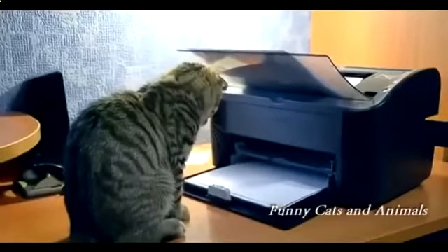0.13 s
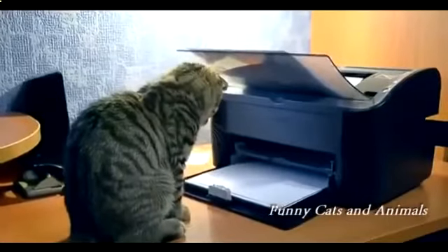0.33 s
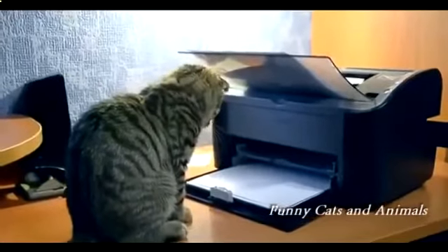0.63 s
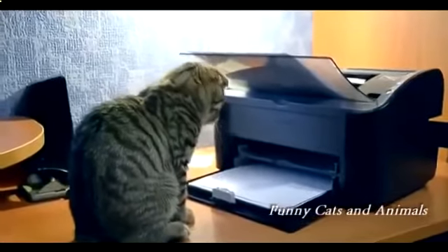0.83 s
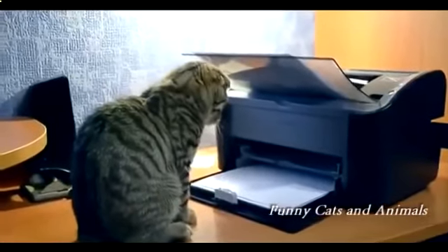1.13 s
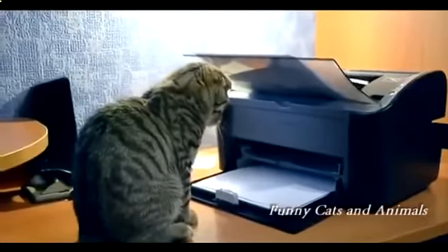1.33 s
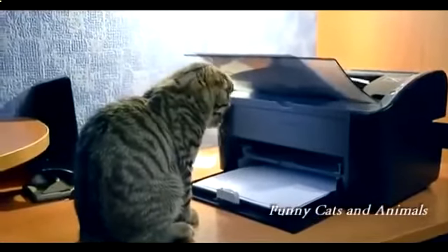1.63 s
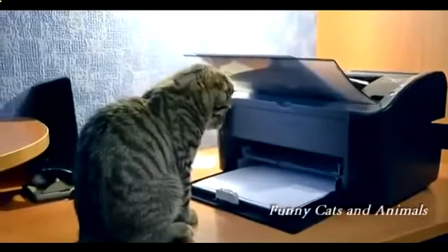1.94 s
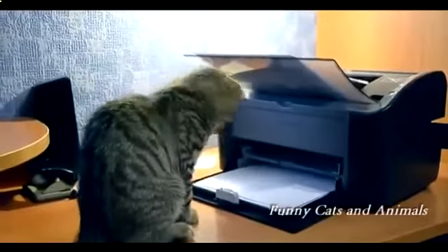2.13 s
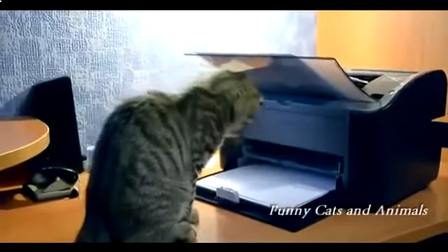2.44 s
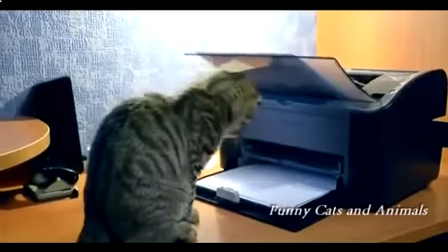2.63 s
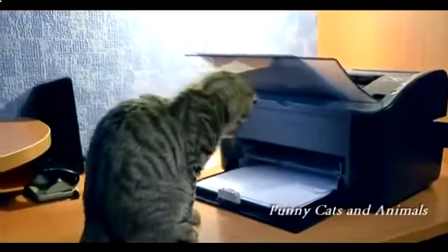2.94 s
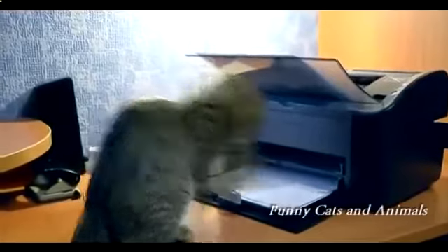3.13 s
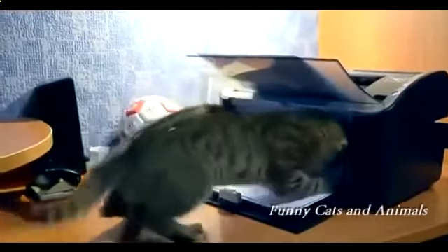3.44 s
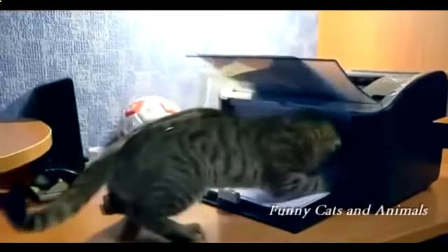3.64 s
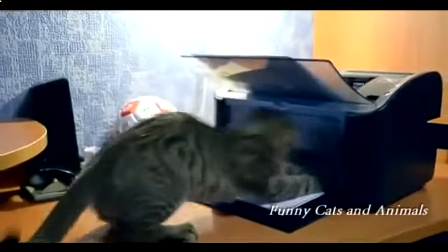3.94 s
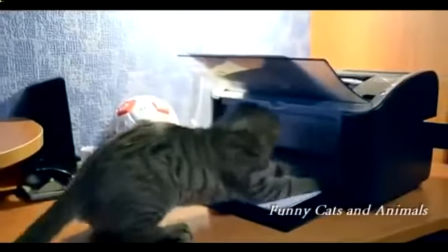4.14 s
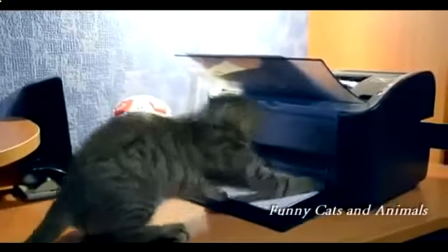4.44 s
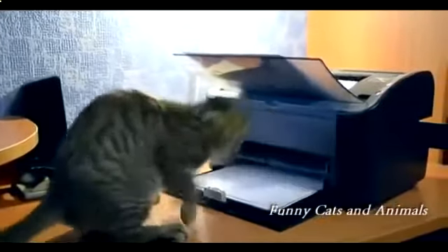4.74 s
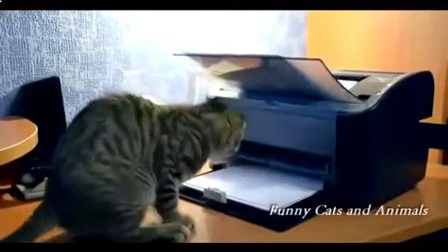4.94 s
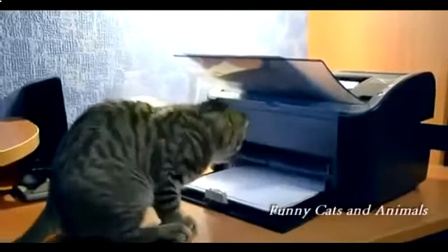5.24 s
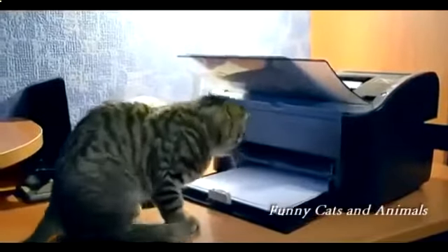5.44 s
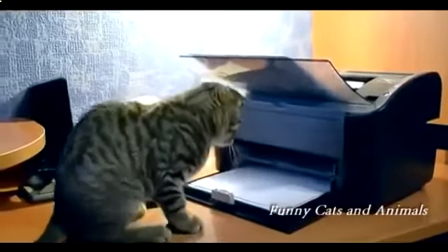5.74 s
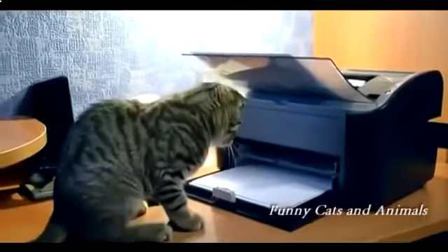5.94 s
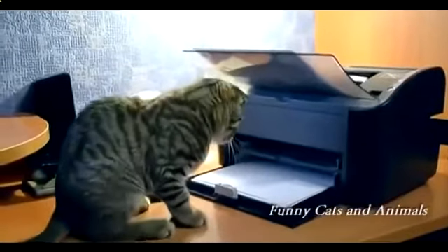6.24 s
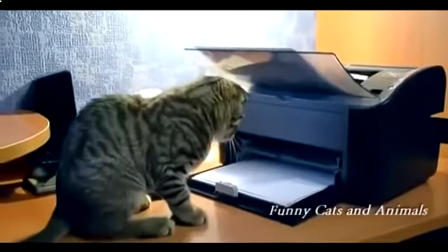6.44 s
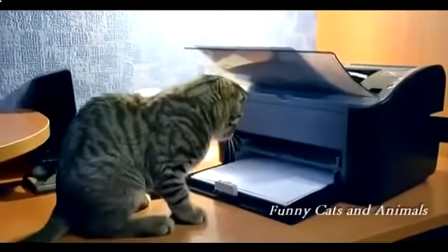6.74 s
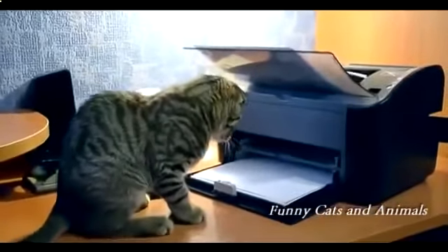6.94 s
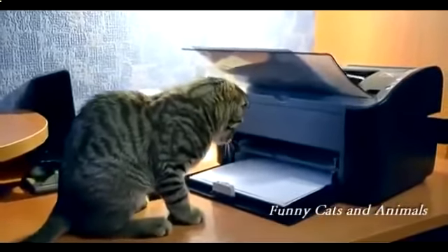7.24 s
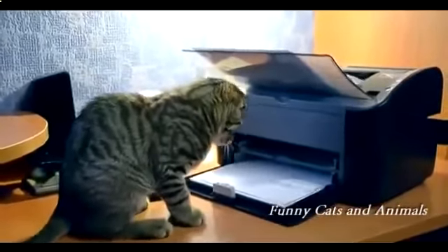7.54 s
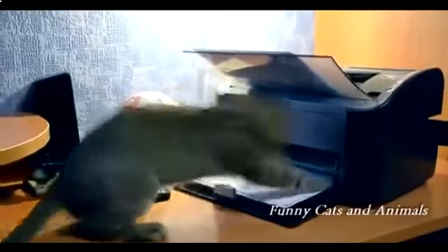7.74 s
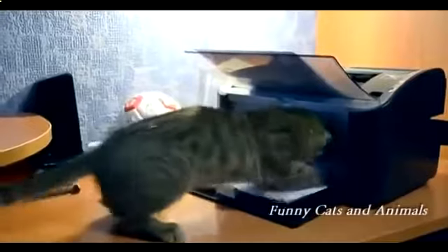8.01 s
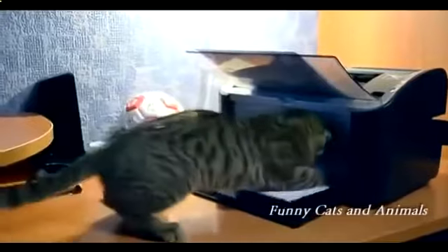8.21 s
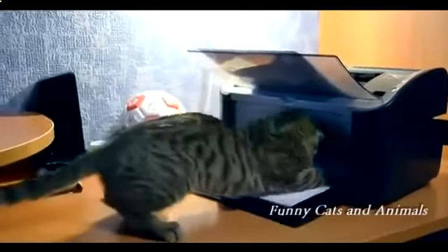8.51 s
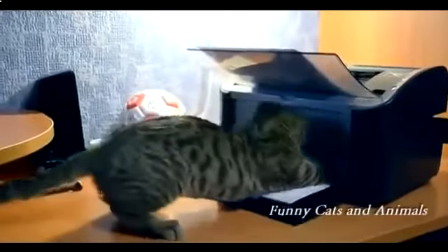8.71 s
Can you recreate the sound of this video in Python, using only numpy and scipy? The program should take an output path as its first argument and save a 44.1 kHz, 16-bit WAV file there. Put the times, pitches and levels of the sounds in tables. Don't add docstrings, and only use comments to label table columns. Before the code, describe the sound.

A desktop laser printer whines and whirrs steadily, paper hissing through, with irregular plastic clacks and a cat's soft paw thumps in a small room.

```python
import sys
import numpy as np
from scipy import signal
from scipy.fft import rfft, irfft
from scipy.io import wavfile
from scipy.ndimage import uniform_filter1d

SR = 44100
rng = np.random.default_rng(int(sys.argv[2]) if len(sys.argv) > 2 else 0)


def transcribe(u):
    v = np.clip(np.atleast_2d(u).T, -1, 1)
    q = np.round(v * 32767).astype(np.int16)
    wavfile.write(sys.argv[1], SR, q)


def natural_amplitude(level_db):
    exponent = np.asarray(level_db, float) / 20
    return 10 ** exponent


N = 391166
TIME = np.arange(N) / SR


def evened(x):
    return x / np.sqrt(np.mean(x ** 2) + 1e-20)


def read(points, hz):
    f, value = np.transpose(points)
    return np.interp(np.log(hz + 1), np.log(f + 1), value)


def wander(rate):
    steps = int(SR / 64 / rate) + 1
    slow = rng.standard_normal(N // 64 + 2)
    slow = evened(uniform_filter1d(uniform_filter1d(slow, steps), steps))
    return np.interp(np.arange(N) / 64, np.arange(len(slow)), slow)


def spans(rows, sag_db=0):
    switch_s = 0.071
    steps = sum((db - sag_db * (TIME - a)) * (TIME >= a) * (TIME < b) for a, b, db in rows)
    return uniform_filter1d(steps, int(switch_s * SR) + 1, mode="nearest")


# multiple of shaft speed, level/dB
SHAFT_ORDERS = [(5, -66), (10, -62.5), (12, -59.5), (24, -62)]
# from t/s, to t/s, level/dB
CASE_SHIFTS = [
    (.48, .72, 1.3),
    (2.1, 3.0, -1),
    (3.65, 4.0, 1.2),
    (4.85, 5.2, 1),
    (6.2, 6.6, -1.1),
    (8.0, 8.45, 2.5),
]


def shaft_motor():
    shaft_hz, whine_db = 84.02, -42.5
    turn = 2 * np.pi * np.cumsum(shaft_hz * (1 + 0.0005 * wander(11.8))) / SR
    tones = natural_amplitude(whine_db + spans(CASE_SHIFTS) + 0.87 * wander(28)) * np.sin(6 * turn)
    for order, db in SHAFT_ORDERS:
        tones += natural_amplitude(db + 2.1 * wander(19)) * np.sin(order * turn + order)
    return np.sqrt(2) * tones


# from t/s, to t/s, level/dB above idle
LOADED = [
    (.57, .79, 8.5),
    (1.33, 1.75, 9),
    (1.9, 2.7, 8),
    (3.0, 3.45, 6),
    (5.02, 5.2, 3),
    (5.9, 6.5, 7.5),
    (6.55, 7.3, 7.5),
    (7.6, 7.92, 5.5),
    (8.15, 8.9, 2.5),
]
# from t/s, to t/s, level/dB against half open
SLOT = [
    (.25, 1.55, 8.5),
    (1.7, 2.8, -13),
    (2.88, 3.52, 6),
    (3.62, 4.4, -9),
    (5.12, 6.4, 7.5),
    (6.55, 7.6, -18),
    (7.7, 8.08, 7),
    (8.35, 8.9, -4),
]


def step_motor():
    step_hz, idle_db, slot_db = 612.85, -56.5, -66.5
    turn = 2 * np.pi * np.cumsum(step_hz * (1 + 0.00044 * wander(11.2))) / SR
    second_db = idle_db + spans(LOADED, sag_db=1.5) + 1.0 * wander(37) + 1.7 * wander(7)
    tones = natural_amplitude(second_db) * np.sin(2 * turn)
    leak_db = slot_db + spans(SLOT) + 2.5 * wander(19)
    tones += natural_amplitude(leak_db) * (np.sin(6 * turn) + natural_amplitude(-0.5) * np.sin(3 * turn))
    held = np.exp(-((TIME - 3.83) / 0.19) ** 2)
    tones += natural_amplitude(-58.5 + 3.6 * wander(30)) * held * np.sin(5 * turn)
    return np.sqrt(2) * tones


def resonate(x, hz, width):
    r = np.exp(-np.pi * width / SR)
    return signal.lfilter([1 - r, 0, r - 1], [1, -2 * r * np.cos(2 * np.pi * hz / SR), r * r], x)


# f/Hz, width/Hz, level/dB
FAN_HUM = [(130.5, 34, -71.5), (307.2, 10.7, -65.5), (370.5, 16, -68.5), (268, 13, -73.5), (1064, 68, -59)]


def fan():
    blades = np.sqrt(2) * natural_amplitude(-70.0 + 3.4 * wander(10)) * np.sin(2 * np.pi * 132.1 * TIME)
    hum = np.zeros(N)
    for hz, width, db in FAN_HUM:
        air = rng.standard_normal(N)
        hum += natural_amplitude(db) * evened(resonate(resonate(air, hz, width), hz, width))
    return blades + hum


def coloured(x, spectrum, patchy_db):
    hz, t, z = signal.stft(x, SR, nperseg=1024, noverlap=768)
    patches = rng.standard_normal(z.T.shape).T
    patches = evened(uniform_filter1d(uniform_filter1d(patches, 10, 0), 12, 1))
    z = z * natural_amplitude(read(spectrum, hz)[:, None] + patchy_db * patches)
    return evened(signal.istft(z, SR, nperseg=1024, noverlap=768)[1][:N])


def grains(per_second, spread_db):
    sizes = natural_amplitude(spread_db * np.minimum(rng.exponential(1, N), 5))
    return evened(sizes * (rng.random(N) < per_second / SR) * rng.choice([-1, 1], N))


# t/s after pick-up begins, level/dB
DRAG = [(0, -2.5), (.3, 1), (.95, 3), (1.12, 0), (1.9, -0.5), (2.8, 1), (3.05, -0.5), (3.2, -5.5),
        (3.7, -3.5), (4.1, -1.5), (4.8, 0.5)]
# t/s, whirr level/dB, hiss level/dB, fade/s
RUSTLES = [
    (2.05, 1, 1.5, .1),
    (3.62, 7, 8, 0.17),
    (3.81, 2, 4, 0.075),
    (4.45, 1, -3.5, 0.13),
    (6.851, 7.5, 2.5, 0.12),
    (8.15, 6.5, 8, .15),
]


def paper_motion():
    sheet_s = 4.8
    s, db = np.transpose(DRAG)
    drag_db = np.interp(TIME % sheet_s, s, db)
    whirr_db, hiss_db = -44.5 + 0.56 * drag_db, -55.5 + drag_db
    for s, whirr_gain, hiss_gain, fade in RUSTLES:
        crumple = (TIME >= s) * np.exp(-abs(TIME - s) / fade)
        whirr_db = whirr_db + whirr_gain * crumple
        hiss_db = hiss_db + hiss_gain * crumple
    return whirr_db, hiss_db


# f/Hz, level/dB per Hz
WHIRR = [(40, -41), (90, -14.5), (150, -9.5), (350, -5), (650, -3.5), (1100, -1), (2100, -3), (3000, -12.5),
         (5000, -30.5), (12000, -42)]


def gear_whirr(level_db):
    chatter = rng.standard_normal(N) + 0.49 * grains(1500, spread_db=3.9)
    whirr = coloured(chatter, WHIRR, patchy_db=1.67)
    return natural_amplitude(level_db - 2.0 + 0.53 * wander(30)) * whirr


# f/Hz, level/dB per Hz
HISS = [(800, -27), (2500, 2), (3500, -0.5), (5000, -5.5), (6500, -5.5), (9000, -9), (11000, -8),
        (15000, -11.5)]


def paper_slide(level_db):
    friction = rng.standard_normal(N) + 0.4 * grains(3000, spread_db=2.6)
    hiss = coloured(friction, HISS, patchy_db=1.5)
    return natural_amplitude(level_db + 5.5 + 1.0 * wander(40)) * hiss


# thud, snap, fizz level/dB
FLAG = (-13.5, -15, -15)
# t/s, level/dB, rattle t60/s, hardness/dB
FLAG_HITS = [
    (.9283, -26, .1, 1.3),
    (4.9031, -25.5, 0.05, 3.5),
    (5.7327, -24.5, 0.14, 2),
    (5.8272, -23.5, 0.085, -3.5),
    (7.4678, -29.5, 0.14, -0.5),
    (8.0656, -23, .23, -0.5),
]
# thud, snap, fizz level/dB
CLUTCH = (-15.5, -21.5, -18)
# t/s, level/dB, rattle t60/s, hardness/dB
CLUTCH_HITS = [
    (1.0111, -21, 0.1, 0.5),
    (1.3054, -24.5, .12, 1.5),
    (2.8943, -21, 0.14, 0),
    (2.9714, -32, .071, 7),
    (3.5444, -21, .23, -1),
    (5.8344, -22, 0.079, 1.5),
    (7.7054, -22, 0.24, .3),
    (8.2536, -25.5, 0.16, .3),
]
# thud, snap, fizz level/dB
TRAY = (-10.5, -18.5, -23.5)
# t/s, level/dB, rattle t60/s, hardness/dB
TRAY_HITS = [
    (1.0191, -28, 0.21, 5),
    (2.6548, -33, .1, 3),
    (3.0944, -31.5, .17, -2),
    (5.8696, -37, .09, -6),
    (6.9095, -29, .15, 0),
    (7.8744, -26, 0.18, 0),
    (8.0406, -32, 0.36, 6.5),
    (8.1193, -30, 0.2, 2),
]
# thud, snap, fizz level/dB
EDGE = (-17.5, -18.5, -21.5)
# t/s, level/dB, rattle t60/s, hardness/dB
EDGE_HITS = [(1.28, -31, 0.17, 2.5), (1.8602, -30.5, 0.052, -1), (2.5072, -32, .09, 0),
             (2.5194, -31, 0.16, 5), (2.5726, -27.5, 0.28, 0), (2.6204, -29, 0.19, -3),
             (2.9294, -26.5, 0.16, -1), (4.4373, -25, 0.12, 3), (5.9254, -45, .091, -4),
             (6.0861, -33, .16, 4), (6.1135, -28, 0.11, 2.5), (6.6453, -28.5, 0.072, -3),
             (7.3043, -31.5, 0.18, 0), (7.3567, -28.5, 0.28, -3), (7.42, -29, 0.077, 4),
             (7.443, -27, 0.12, -4), (8.2944, -27, .19, 2)]
# thud, snap, fizz level/dB
SOLENOID = (-30.5, -18, -11)
# t/s, level/dB, rattle t60/s, hardness/dB
SOLENOID_HITS = [
    (1.4167, -18.5, 0.14, -2.5),
    (6.231, -20, 0.084, 1.3),
    (6.25, -27.5, 0.16, -2),
    (8.2653, -33, 0.21, 5.5),
]
# thud, snap, fizz level/dB
ROLLER = (-13.5, -24.5, -30.5)
# t/s, level/dB, rattle t60/s, hardness/dB
ROLLER_HITS = [(1.935, -16, 0.078, 0), (1.9494, -15.5, 0.19, -3), (2.0754, -17, 0.11, -4),
               (2.1848, -26, .092, 3), (2.7504, -25.5, 0.15, 1), (3.011, -32, 0.11, -5),
               (3.047, -16, .16, 0.5), (4.807, -25.5, .055, 1), (6.7398, -15, 0.16, -2.5),
               (6.7534, -21.5, 0.18, 3), (6.7883, -23, 0.092, -3), (6.8621, -15.5, 0.17, 0),
               (7.8324, -14.5, 0.096, 1.5), (8.549, -24, .1, -8)]
# thud, snap, fizz level/dB
CAM = (-15.5, -17.5, -23.5)
# t/s, level/dB, rattle t60/s, hardness/dB
CAM_HITS = [
    (2.0861, -15.5, 0.13, 2.5),
    (3.0674, -22, 0.063, 0.5),
    (3.613, -23, 0.084, -3),
    (6.8782, -17, 0.076, 0.5),
    (7.534, -25, 0.075, -4.5),
    (7.8523, -21, .089, 2),
]
# thud, snap, fizz level/dB
PAWL = (-14, -15, -15.5)
# t/s, level/dB, rattle t60/s, hardness/dB
PAWL_HITS = [
    (2.165, -22, 0.066, .3),
    (6.9691, -24, 0.13, .3),
]
# thud, snap, fizz level/dB
CLAW = (-11, -13, -8.5)
# t/s, level/dB, rattle t60/s, hardness/dB
CLAW_HITS = [
    (3.5269, -27, 0.25, 6),
    (3.5791, -28, 0.18, -2),
    (4.157, -36.5, 0.07, -2),
    (4.59, -46, 0.065, 3),
    (4.7129, -18, 0.043, -1),
    (4.7247, -22.5, 0.12, -1.5),
    (7.7584, -37, .087, 1),
]


def strikes():
    parts = ((FLAG, FLAG_HITS), (CLUTCH, CLUTCH_HITS), (TRAY, TRAY_HITS), (EDGE, EDGE_HITS),
             (SOLENOID, SOLENOID_HITS), (ROLLER, ROLLER_HITS), (CAM, CAM_HITS),
             (PAWL, PAWL_HITS), (CLAW, CLAW_HITS))
    rows = []
    for (thud, snap, fizz), hits in parts:
        for s, db, t60, hard in hits:
            rows.append((s, db, thud, snap + hard, fizz + hard, t60))
    return sorted(rows)


def ringing(modes, shifts, hz):
    centre, t60, db = np.transpose(modes)[:, :, None]
    count = len(modes)
    centre = centre * (1 + 0.073 * shifts[:count, None])
    gains = natural_amplitude(db + 3.2 * shifts[::-1][:count, None])
    peaks = (gains / (1 + 1j * (hz - centre) * t60 / 1.62)).sum(0)
    low, high = 1j * hz / (0.78 * modes[0][0]), 1j * hz / (1.177 * modes[-1][0])
    edges = low ** 2 / (1 + 1.38 * low + low ** 2) / (1 + 1.48 * high + high ** 2)
    return peaks * edges ** 2


# f/Hz, t60/s, level/dB
PANELS = [(245, 0.088, -26.5), (387, 0.06, -12), (471, 0.036, -1.5), (623, 0.0054, -4), (745, 0.032, 1.5),
          (863, 0.084, 6)]
# f/Hz, t60/s, level/dB
SHELL = [(1095, 0.052, 0.5), (1314, 0.041, 0.5), (1553, 0.016, -2.5), (1820, 0.015, -8),
         (2020, 0.012, -0.5), (2460, 0.014, -8)]
# f/Hz, t60/s, level/dB
LATCH = [(3080, 0.0056, -1.5), (3350, 0.011, -2.5), (3790, 0.0063, 2.5), (4310, 0.018, -0.5),
         (4900, 0.0024, -1.5)]
# f/Hz, t60/s, level/dB
SPRING = [(6100, 0.019, -3), (6920, 0.0058, 1), (7780, 0.0095, 2), (9430, 0.0049, -18.5), (9500, 0.003, -1),
          (13650, 0.0026, -6.5)]
# f/Hz, t60/s, level/dB
PLUNGER = [(1800, .016, 7), (2100, 0.027, 7), (2720, 0.0086, -1.5), (4100, 0.029, -11), (5670, 0.023, -1.5),
           (7100, 0.0087, -3)]


def clack(row):
    s, peak_db, thud_db, snap_db, fizz_db, t60 = row
    t, hz = np.arange(8192) / SR, np.fft.rfftfreq(8192, 1 / SR)
    chance, size = rng.random(len(t)), rng.standard_normal(len(t))
    shifts = rng.uniform(-1, 1, (4, 6))
    shifts = [*shifts, 0.3 * shifts[0]]
    contact = (0.5 + 0.5 * np.exp(-t / 0.0018)) * size[::-1]
    knocks = (chance < 4000 / SR) * size + contact
    thin = np.clip(-thud_db - 17.5, 0, 15)
    shell = [(f, ring_t60, db + 0.78 * thin * min(np.log2(f / 1800), 0)) for f, ring_t60, db in SHELL]
    groups = ((PANELS, thud_db - 5.5, 1.2, 0.006),
              (shell, -11.5 - 1.6 * max(thin - 8.5, 0), 1.05, 0.003),
              (LATCH, snap_db - 1.5, 0.8, 0.002),
              (SPRING, fizz_db - 3.0, 0.7, 0.0015),
              (PLUNGER, -10.5 - 2.6 * max(12.5 - thin, 0), 0.9, 0.0012))
    out = np.zeros(len(t))
    for (modes, db, slower, rise), shift in zip(groups, shifts):
        decay = natural_amplitude(-60 * t / np.clip(t60 * slower, 0.01, 0.25))
        blows = knocks * (1 - np.exp(-t / rise)) * decay
        ring = irfft(rfft(blows) * ringing(modes, shift, hz))
        loudest = np.sqrt(uniform_filter1d(ring[:2048] ** 2, 400).max())
        out += natural_amplitude(peak_db + db) * ring / loudest
    return round((s - 0.0028) * SR), out


# f/Hz, t60/s
ROOM = [(200, 0.28), (1000, 0.24), (4000, 0.22), (10000, 0.17)]


def room(x):
    taps = np.zeros(SR // 2)
    at = np.arange(200, len(taps) - 20, 20)
    taps[at + rng.integers(0, 20, len(at))] = rng.choice([-1., 1.], len(at))
    hz, t, z = signal.stft(taps, SR, nperseg=256)
    decay = natural_amplitude(-60 * t / read(ROOM, hz)[:, None])
    tail = signal.istft(z * decay, SR, nperseg=256)[1]
    return signal.fftconvolve(x, tail / np.linalg.norm(tail))[:N]


# f/Hz, t60/s, level/dB
DESK = [(75, .1, -36), (112, 0.12, -10), (156, .08, 4), (220, 0.031, 1), (290, 0.14, 22)]


def paw(row):
    s, peak_db, t60 = row
    t, hz = np.arange(16384) / SR, np.fft.rfftfreq(16384, 1 / SR)
    decay = natural_amplitude(-60 * t / np.clip(t60, 0.02, 0.35))
    push = rng.standard_normal(len(t)) * (1 - np.exp(-t / 0.0035)) * decay
    thump = irfft(rfft(push) * ringing(DESK, rng.uniform(-0.32, 1, 6), hz))
    return round(s * SR), natural_amplitude(peak_db - 4.0) * thump / abs(thump).max()


# t/s, level/dB, t60/s
PAWS = [(3.05, -35, 0.15), (3.54, -33, 0.16), (3.566, -44, 0.2), (3.718, -47, 0.2), (3.781, -40, 0.14),
        (3.841, -58, 0.2), (4.3, -48, .2), (4.708, -37.5, 0.17), (5.757, -45, 0.15), (7.832, -35.5, 0.17),
        (8.045, -41, 0.13), (8.09, -45, 0.2), (8.271, -42, 0.18)]


def scene():
    whirr_db, hiss_db = paper_motion()
    steady = shaft_motor() + step_motor() + fan() + gear_whirr(whirr_db) + paper_slide(hiss_db)
    hits = np.zeros(N + SR)
    for at, sound in [clack(row) for row in strikes()] + [paw(row) for row in PAWS]:
        hits[at:at + len(sound)] += sound
    mono = steady + hits[:N] + natural_amplitude(-6.5) * room(hits[:N])
    return np.array([mono, mono])


# f/Hz, level/dB
MIC = [(60, -4.5), (200, -0.5), (7300, 0), (7950, -7.5), (8600, 1.5), (10000, -7), (10700, -14.5),
       (11300, -20.5), (11800, -26), (12500, -18.5), (14800, -26), (15500, -60)]


def heard_spectrum(x):
    hz, t, z = signal.stft(x, SR, nperseg=2048)
    z = z * natural_amplitude(read(MIC, hz))[:, None]
    power = np.add.reduceat(abs(z) ** 2, np.arange(0, len(hz), 16)) / 16
    band_db = 10 * np.log10(power + 1e-20)[np.arange(len(hz)) // 16]
    floor_db = np.where(hz > 11600, -99, -98.5)[:, None]
    return hz, z * ((hz[:, None] < 9600) | (band_db > floor_db))


# f/Hz, share of time
UNLIKE = [(2800, .005), (3600, .08), (4400, .3), (5000, .05), (5500, .25), (7000, .05), (8500, .08),
          (11000, .05)]


def two_sides(hz, z):
    band = np.arange(len(hz)) // 16
    chance = rng.random((z.shape[1], band[-1] + 1)).T[(band * 2) // 3]
    differs = chance < read(UNLIKE, hz)[:, None] * (hz[:, None] > 2400)
    side = z * differs * natural_amplitude(-15.5) * np.exp(2j * np.pi * rng.random(z.T.shape).T)
    return np.array([z + side, z - side])


def band_limit(x):
    return signal.sosfilt(signal.butter(12, 15340, fs=SR, output="sos"), x)


def record(dry):
    hz, z = heard_spectrum(dry[0])
    both = signal.istft(two_sides(hz, z), SR, nperseg=2048)[1][:, :N]
    return band_limit(both)


dry = scene()
out = record(dry)
transcribe(out)
```